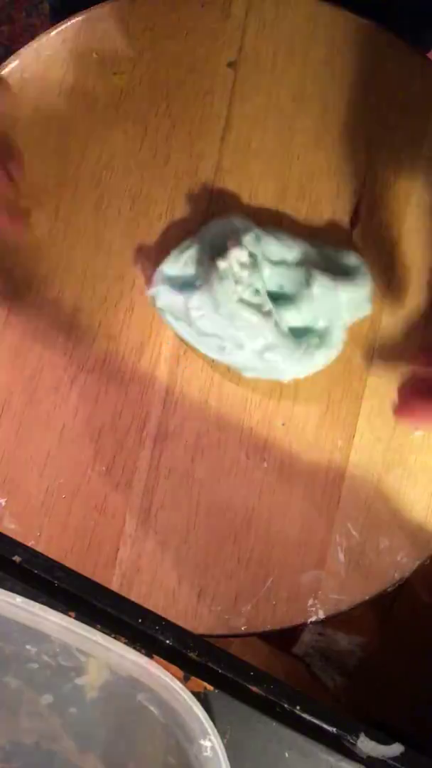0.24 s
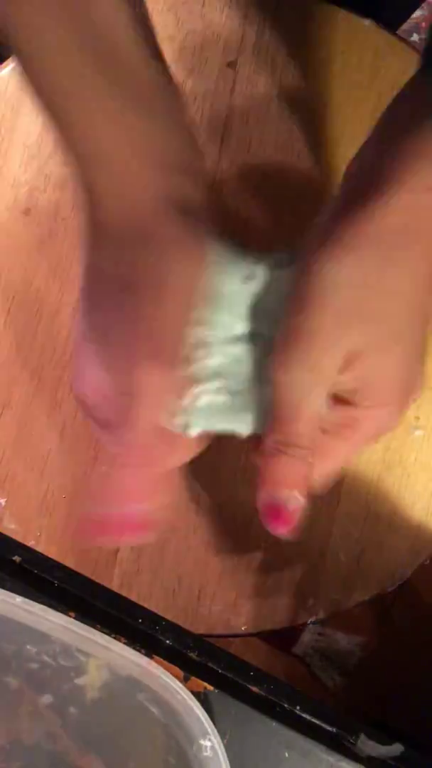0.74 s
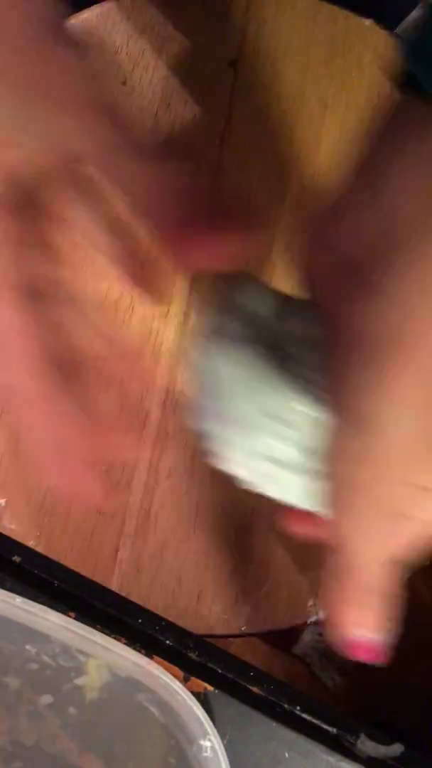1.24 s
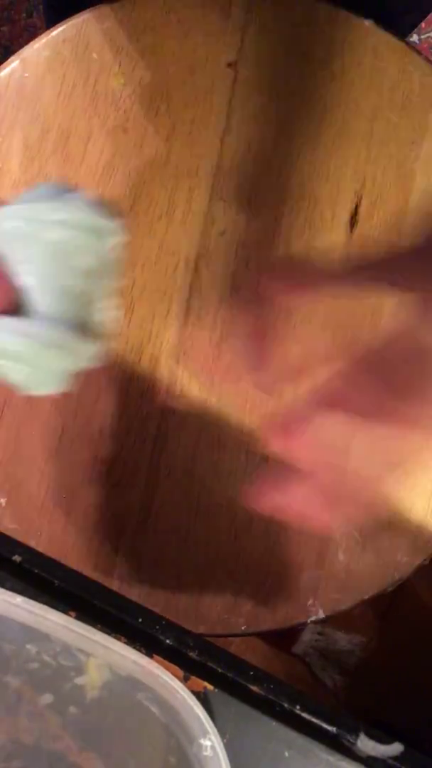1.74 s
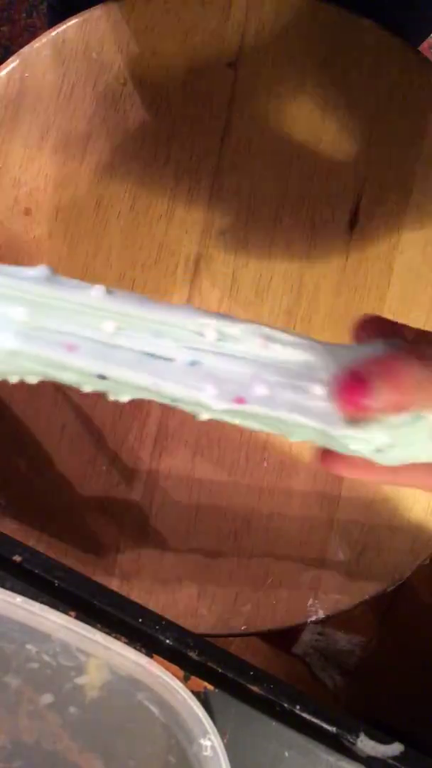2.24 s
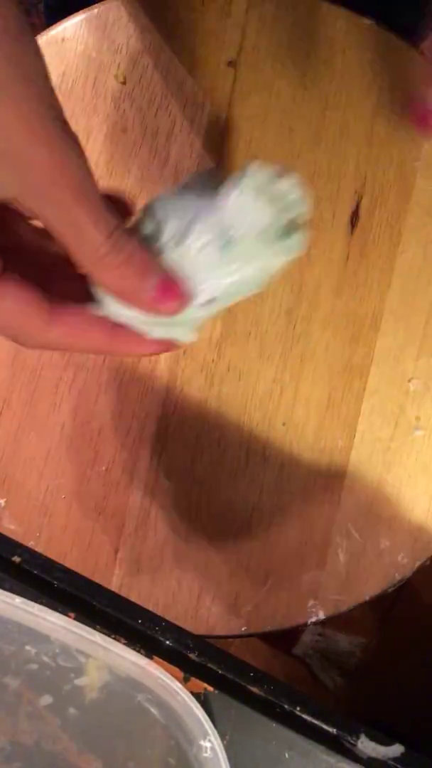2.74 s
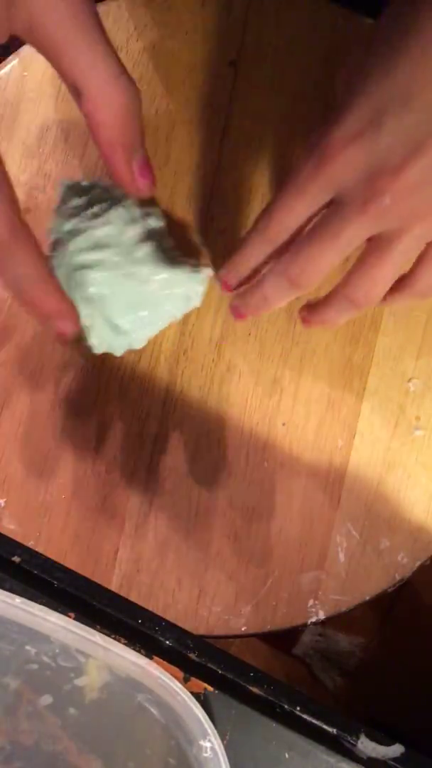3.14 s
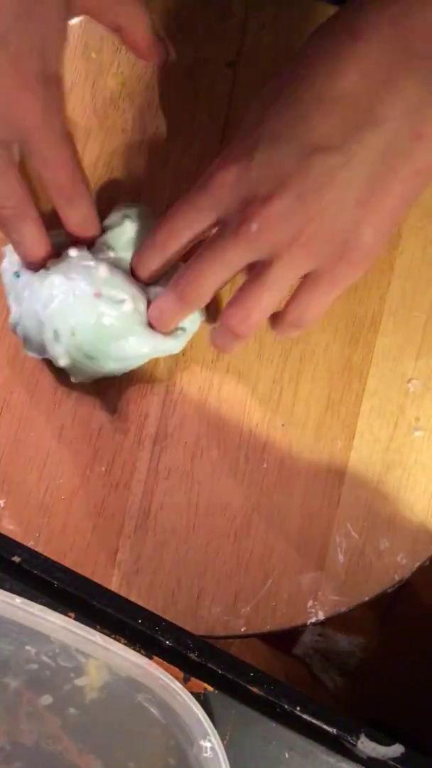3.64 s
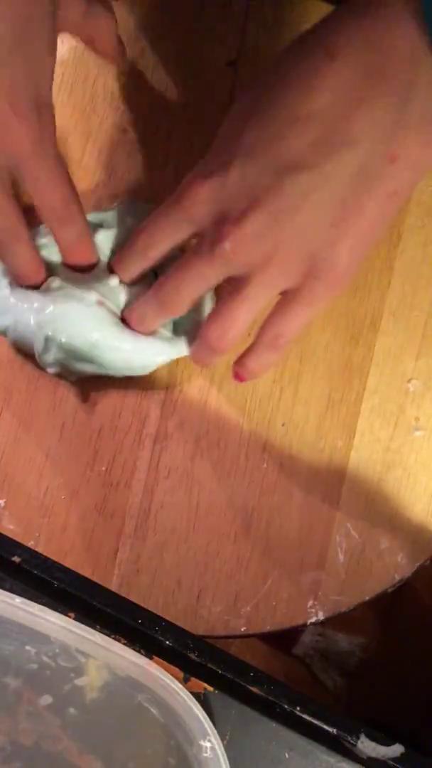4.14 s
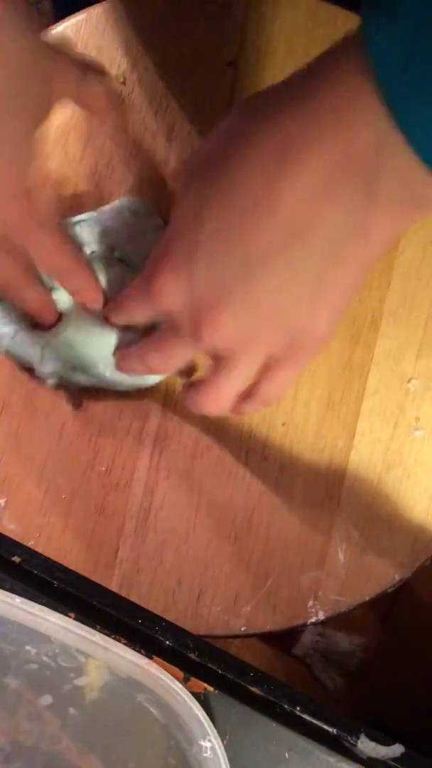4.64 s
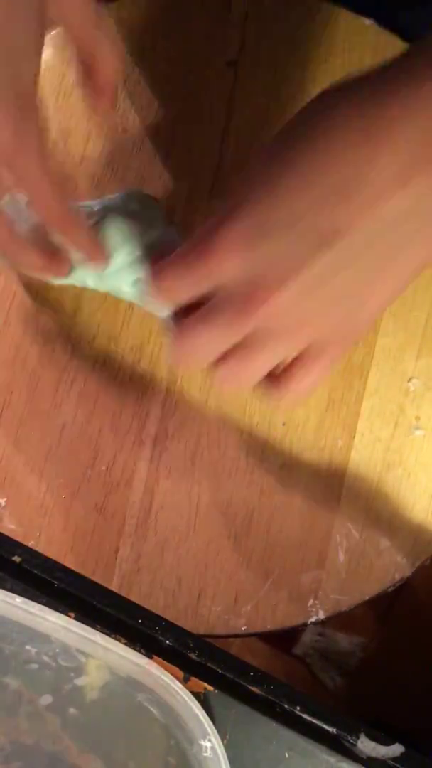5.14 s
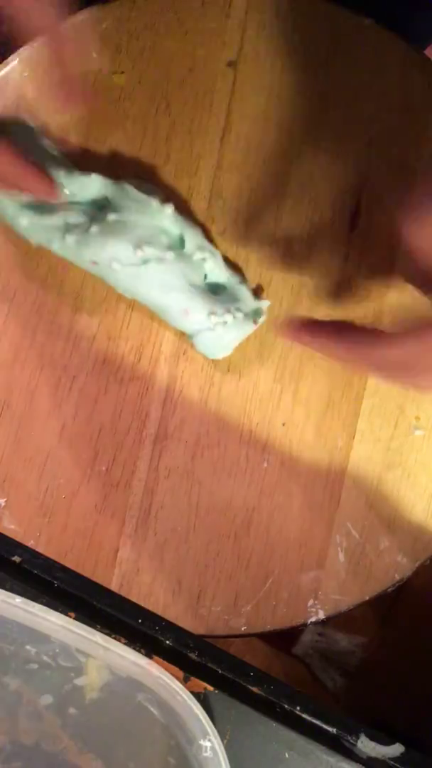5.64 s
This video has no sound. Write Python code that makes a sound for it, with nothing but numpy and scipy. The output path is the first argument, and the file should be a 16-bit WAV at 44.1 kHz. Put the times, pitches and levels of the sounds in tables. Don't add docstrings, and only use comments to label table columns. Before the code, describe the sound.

Sticky slime is pressed, pulled and folded by hand. Sparse tiny clicks and peeling crackle dominate the first half, with a cluster of bright pops around one and a half seconds. Later, dull fingertip knocks on a wooden table top mix with wet gurgling plops and several very sharp air-bubble snaps. Recorded close and mostly dry, indoors, with faint room drone and hiss beneath.

```python
import sys
import numpy as np
from scipy import signal
from scipy.fft import rfft, irfft, next_fast_len
from scipy.io import wavfile
from scipy.ndimage import uniform_filter1d, map_coordinates

SR = 44100
rng = np.random.default_rng(int(sys.argv[2]) if len(sys.argv) > 2 else 0)


def int16_out(signal):
    q = np.round(np.clip(np.atleast_2d(signal).T, -1, 1) * 32767)
    wavfile.write(sys.argv[1], SR, q.astype(np.int16))


def magnitude_from_level(level_db):
    exponent = np.asarray(level_db, float) / 20
    return 10 ** exponent


N = 260441


def unit(x):
    return x / np.sqrt(np.mean(x ** 2) + 1e-20)


def peak_one(x):
    return x / np.abs(x).max()


def add_at(out, start_s, sound):
    out[..., round(start_s * SR):][..., :sound.shape[-1]] += sound


def noise():
    return rng.standard_normal(N)


def along(points, hz):
    f, v = np.transpose(points)
    return np.interp(np.log(hz + 1), np.log(f + 1), v)


def curves(rows):
    s, *cols = np.transpose(rows)
    return [np.interp(np.arange(N) / SR, s, c) for c in cols]


def wobble(rate_hz):
    knots = rng.standard_normal(int(N * rate_hz / SR) + 4)
    return map_coordinates(knots, [np.arange(N) * rate_hz / SR])


def swells(peaks, rise_s, fall_s):
    swell_db, hop = 36.5, 64
    late = np.arange(0, N + hop, hop)[None] / SR - peaks[0][:, None]
    steps = np.maximum(-late / np.reshape(rise_s, (-1, 1)), late / np.reshape(fall_s, (-1, 1)))
    power = np.sum(magnitude_from_level(peaks[1][:, None] - swell_db * steps) ** 2, axis=0)
    return np.interp(np.arange(N), np.arange(len(power)) * hop, np.sqrt(power))


def filtered(x, response):
    m = next_fast_len(len(x) + min(len(x), 4096))
    return irfft(rfft(x, m) * response(np.fft.rfftfreq(m, 1 / SR)), m)[:len(x)]


def modes(rows):
    def response(f):
        return sum((-1) ** k * magnitude_from_level(db) * 1j * f * w / (c * c - f * f + 1j * f * w)
                   for k, (c, w, db) in enumerate(rows))
    return response


def coloured(spectrum):
    return lambda hz: magnitude_from_level(along(spectrum, hz))


def grains(per_second, spread_db, hiss):
    chance, size = rng.random(N), np.minimum(rng.exponential(size=N), 3)
    clicks = (chance < per_second / SR) * magnitude_from_level(spread_db * size) * np.sign(noise())
    return unit(unit(clicks) + hiss * noise())


# freq_hz [Hz], level_db [dB per Hz]
HUSH_SPECTRUM = [(15, -31.5), (25, 4), (100, 6), (233, -1.5), (887, -17.5), (1300, -11.5), (1410, -15.5),
                 (2780, -18), (7630, -22.5), (9230, -20), (10000, -25.5), (14700, -22), (16300, -21.5)]


def hush():
    hiss = filtered(noise(), lambda f: coloured(HUSH_SPECTRUM)(f) * (f < 15950))
    return magnitude_from_level(-67 + 1.1 * wobble(3)) * unit(hiss)


# time_s [s], level_db [dB]
SCRAPE_LEVELS = [
    [(1.745, -70), (1.77, -61), (1.86, -64.5), (2.0, -78)],
    [(5.8, -101), (5.874, -64.5), (5.906, -69)],
]
# freq_hz [Hz], width_hz [Hz], level_db [dB]
NEAR_BODY = [(550, 95, 4.5), (750, 54, 3.5), (2800, 220, -8), (3280, 45, 3), (4840, 390, -14.5),
             (5750, 110, -2.5)]
FAR_BODY = [(1680, 110, 1), (3100, 50, 0), (3880, 150, -4), (7170, 39, 8), (10400, 33, -2)]
MODE_FADES = [8, -7, -16, 200, 30, 148]
# centre_s [s], level_db [dB], pitch_hz [Hz], length_s [s]
SQUEAK_EVENTS = [
    (1.282, -68, 780, 0.12),
    (1.245, -69.5, 1280, 0.038),
    (2.105, -73.5, 1290, 0.073),
    (2.263, -78, 1180, 0.047),
    (2.33, -69.5, 1270, 0.066),
    (3.628, -66.5, 1266, 0.084),
]


def far_off():
    t, out = np.arange(N) / SR, np.zeros(N)
    catch_s = 1.777
    since_s = np.abs(t - catch_s) * (t < 3)
    for rows, body, lift_db in zip(SCRAPE_LEVELS, (NEAR_BODY, FAR_BODY), (4, -2.5)):
        inside = uniform_filter1d(1. * ((t > rows[0][0]) & (t < rows[-1][0])), size=2500)
        hum = np.zeros(N)
        for mode, fade_db_per_s in zip(body, MODE_FADES):
            swell = magnitude_from_level(3.5 * wobble(30) - fade_db_per_s * since_s)
            hum += swell * filtered(noise(), modes([mode]))
        hum /= np.sqrt(np.average(hum ** 2, weights=inside))
        out += inside * magnitude_from_level(curves(rows)[0] + lift_db) * hum
    for centre_s, db, hz, length_s in SQUEAK_EVENTS:
        narrow = unit(filtered(noise(), modes([(hz, 30, 0)])))
        out += magnitude_from_level(db) * np.exp(-np.abs(1.56 * (t - centre_s) / length_s) ** 5.9) * narrow
    return out


# time_s [s], force_db [dB], wetness_db [dB], loudest_hz (place on the table) [Hz]
PUSH_CURVES = [(0, -77, 13.5, 236), (.25, -42, -12.5, 212), (.34, -60.5, -5.5, 243), (.62, -66, -4, 200),
               (1.89, -64.5, -10, 264), (2.91, -74, -1, 186), (3.04, -52, -21, 147),
               (3.14, -60.5, -10.5, 194), (3.33, -63.5, -9, 202), (3.39, -59.5, -4.5, 266),
               (3.95, -55.5, -12, 262), (4.09, -53, -7, 255), (4.19, -46, -15, 192), (4.34, -55, -6, 295),
               (4.65, -52, -7.5, 330), (4.8, -53, -5.5, 238), (4.98, -55, -19, 209.5),
               (5.91, -61, -12, 217)]
# peak_s [s], level_db [dB]
LEG_HEAVES = [
    (.27, -54),
    (1.89, -86),
    (3.05, -56.5),
    (3.9, -55),
    (4.2, -60.5),
    (4.799, -62.5),
    (5.35, -61),
]
# freq_hz [Hz], width_hz [Hz], level_db [dB]
TABLE_MODES = [(123.8, 7.2, 1.5), (148.3, 16, 3), (206, 14.5, 1), (256.8, 19, -0.5), (317, 28, 3),
               (371, 24, 0.5)]
# freq_hz [Hz], width_hz [Hz], level_db [dB]
WET_POCKETS = [(452, 320, 1.5), (714, 40, 4), (780, 14, 2.5), (1100, 180, -9.5), (1280, 220, -1.5),
               (1690, 43, -5.5), (2180, 160, -15.5)]


def pushing():
    table_db, wetness_db, loudest_hz = curves(PUSH_CURVES)
    lumps = wobble(25)

    wood, power = np.zeros(N), np.zeros(N)
    for hz, width_hz, db in TABLE_MODES:
        away_db = np.minimum(22 * np.abs(np.log2(hz / loudest_hz)), 12)
        share = magnitude_from_level(db + 1.5 * wobble(5) - away_db)
        shaking = grains(300, spread_db=0.0, hiss=1.83)
        wood += share * unit(filtered(shaking, modes([(hz, width_hz, db)])))
        power += share ** 2
    wood /= np.sqrt(power)

    squeezes, wet = grains(260, spread_db=1.0, hiss=0.7), np.zeros(N)
    for k, pocket in enumerate(WET_POCKETS):
        swell = magnitude_from_level(3.8 * np.clip(wobble(45), -2, 1.5))
        wet += swell * filtered(np.roll(squeezes, k * SR // 3), modes([pocket]))

    rocking = swells(np.transpose(LEG_HEAVES), rise_s=0.052, fall_s=0.35) + magnitude_from_level(-75.5)
    legs, floor = modes([(60, 30, 0), (90, 30, -1)]), modes([(75, 70, 0)])
    sway = filtered(noise(), lambda f: legs(f) * floor(f))

    wood_gain = magnitude_from_level(table_db + 0.69 * lumps + 1.98 * wobble(6))
    wet_gain = magnitude_from_level(table_db + wetness_db + 1.1 * lumps)
    return wood_gain * wood + wet_gain * unit(wet) + rocking * unit(sway)


# freq_hz [Hz], level_db [dB per Hz]
RUSH_SPECTRUM = [(880, -2), (1500, -0.5), (2820, -6), (4580, -1.5), (10200, -4), (14300, -4), (15900, 2)]


def air_rush():
    peak_s, level_db, rise_s, fall_s, bright_hz = 0.24, -47.5, 0.054, 0.078, 7050
    late = np.arange(N) / SR - peak_s
    skin = unit(filtered(noise(), lambda f: coloured(RUSH_SPECTRUM)(f) * (f < 15950)))
    dull = filtered(skin, lambda f: 1 / (1 + (f / bright_hz) ** 4))

    def swell(lasts):
        return np.exp(-(late / np.where(late < 0, rise_s, lasts * fall_s)) ** 2 / 2)

    return magnitude_from_level(level_db + 0.65 * wobble(36.0)) * (swell(0.9) * dull + swell(0.33) * (skin - dull))


# start_s [s], peak_db [dB], pitch_hz [Hz]
FINGER_KNOCKS = [(0.197, -41, 258), (3.018, -35.5, 134), (3.032, -41.5, 146), (3.056, -47.5, 170),
                 (3.095, -49, 200), (3.231, -49, 179), (3.396, -49, 260), (3.709, -66, 202),
                 (4.096, -37.5, 209), (4.306, -40, 304), (4.358, -39.5, 299), (4.44, -58, 320),
                 (4.49, -49, 334), (3.87, -53, 380), (3.98, -48, 387), (4.53, -43.5, 290), (4.57, -48, 324),
                 (4.624, -37.5, 313), (4.679, -42, 335), (4.752, -35.5, 202), (4.938, -37, 217),
                 (5.049, -45, 198), (5.159, -40, 222), (5.274, -48, 195), (5.299, -54, 206),
                 (5.356, -50, 200), (5.403, -42, 204), (5.419, -42.5, 206), (5.519, -50.5, 196),
                 (5.636, -65, 220), (5.661, -40.5, 228), (5.685, -50, 254), (5.776, -51, 196),
                 (5.796, -46, 196),
                 (0.368, -57, 247),
    (0.495, -55, 245),
    (0.916, -46.5, 155),
    (1.147, -59, 183),
    (1.343, -54, 241),
    (1.45, -49, 210),
    (1.66, -50.5, 242),
    (1.807, -46.5, 249),
    (1.78, -48, 553),
    (1.838, -52.5, 249),
]
# start_s [s], peak_db [dB], pitch_hz [Hz]
MORE_KNOCKS = [
    (2.475, -55, 246),
    (2.54, -58.5, 330),
    (2.595, -51.5, 215),
    (2.704, -57, 193),
    (3.44, -48, 300),
    (3.864, -48, 149),
    (4.004, -46, 251),
    (4.158, -44, 207),
    (4.24, -49, 203),
    (4.35, -40, 206),
]


def knocks(rows):
    out, t = np.zeros(N + SR), np.arange(6144) / SR
    for start_s, db, hz in rows:
        blow = (1 - np.exp(-t / 0.00099)) * magnitude_from_level(-60 * t / 0.045) * rng.standard_normal(len(t))
        ring = filtered(blow, modes([(hz, 26, 0), (1.505 * hz, 90, -9)]))
        add_at(out, start_s, magnitude_from_level(db - 1.5) * peak_one(ring))
    return out[:N]


# peak_s [s], crackle_db [dB], rub_db [dB], rise_s [s], fall_s [s]
PEEL_EVENTS = [(.075, -58.5, -69, 0.026, 0.24), (0.117, -53, -56, 0.045, 0.13),
               (.43, -64.5, -82, 0.22, 0.25), (.585, -56.5, -69.5, 0.27, .15),
               (0.689, -56.5, -68, 0.38, 0.44), (.81, -58, -70, .15, 0.33),
               (1.11, -59.5, -70.5, 0.17, 0.18), (1.3, -82, -88, 0.42, .3), (.914, -44, -52.5, 0.14, 0.11),
               (1.158, -68, -70, 0.036, .1), (1.179, -46, -61, 0.048, 0.015),
               (1.454, -49.5, -63.5, 0.12, 0.39), (1.637, -47, -58.5, 0.15, 0.075),
               (2.02, -67.5, -71, 1, 0.25), (2.141, -57.5, -82, .09, 0.14), (2.66, -64, -69, 1, 0.5),
               (2.706, -56, -73, 0.13, 0.11), (2.78, -59, -67.5, 0.084, 0.071),
               (2.965, -56.5, -66, 0.17, 0.091), (3.06, -66.5, -78, 0.24, .2), (3.135, -62, -82, 0.052, .1),
               (3.213, -57, -74, 0.06, 0.054), (3.57, -70.5, -75.5, 0.18, 1.7),
               (3.875, -51, -58.5, 0.083, 0.26), (4.186, -59.5, -59.5, 0.31, 1.3),
               (4.41, -51.5, -48, 0.05, 0.19), (4.68, -70, -68, 0.14, 0.85),
               (4.822, -51.5, -50.5, 0.021, 0.28), (5.082, -67.5, -81, 0.19, 1.6),
               (5.561, -64, -61.5, 0.21, 0.065), (5.606, -44.5, -46, 0.045, .11),
               (5.905, -68, -59, 0.12, .1)]
# freq_hz [Hz], level_db [dB per Hz]
FILM_SPECTRUM = [(4650, -42), (7900, -12), (8530, -9.5), (12700, -7.5), (14800, -1.5), (15800, 1),
                 (16500, -12)]
# freq_hz [Hz], level_db [dB per Hz]
SKIN_SPECTRUM = [(1060, -8), (1800, -1.5), (1970, -3.5), (2260, 0), (2820, -3), (4560, -2.5), (8500, -7),
                 (11000, -37.5), (18700, -120)]
PATCH_EDGES = [0, 2600, 4000, 6000, 20000]


def peeling():
    peak_s, crackle_db, rub_db, rise_s, fall_s = np.transpose(PEEL_EVENTS)
    rub_lingers = 0.88
    tearing = swells((peak_s, crackle_db), rise_s, fall_s)
    rubbing = swells((peak_s, rub_db), rub_lingers * rise_s, rub_lingers * fall_s)
    crackle = filtered(grains(900, spread_db=3, hiss=1.1),
                       lambda f: coloured(FILM_SPECTRUM)(f) * (f > 7900) * (f < 15950))
    skin, rub = filtered(grains(1100, spread_db=4.0, hiss=1.36), coloured(SKIN_SPECTRUM)), np.zeros(N)
    for lo, hi in zip(PATCH_EDGES, PATCH_EDGES[1:]):
        rub += magnitude_from_level(3.2 * wobble(30)) * filtered(skin, lambda f: (f >= lo) * (f < hi))
    flutter = magnitude_from_level(-3.0 + 2 * wobble(90))
    return flutter * (tearing * unit(crackle) + rubbing * unit(rub))


# start_s [s], peak_db [dB], pitch_hz [Hz]
SKIN_TICKS = [(0.613, -51.5, 5800), (0.704, -55, 3650), (0.819, -52.5, 3940), (1.087, -47.5, 2880),
              (1.478, -66, 2300), (1.55, -48.5, 2380), (1.59, -56, 2300), (1.615, -58, 2400),
              (2.601, -53, 3380), (2.602, -59, 1300), (.675, -56, 1480), (4.033, -60, 2540),
              (4.089, -49, 2530), (4.141, -50, 4720), (4.152, -56, 4500), (4.223, -47.5, 4450),
              (4.273, -47.5, 4250), (4.287, -49, 4370), (4.343, -52, 3380), (4.375, -44, 4860),
              (4.39, -44, 1300), (4.572, -52, 1930), (5.158, -57, 3040), (.118, -48, 3300)]


def dull_ticks():
    out, t = np.zeros(N + SR), np.arange(1024) / SR
    for start_s, db, hz in SKIN_TICKS:
        click = filtered(magnitude_from_level(-60 * t / 0.02) * rng.standard_normal(len(t)), modes([(hz, 0.28 * hz, 0)]))
        add_at(out, start_s, magnitude_from_level(db) * peak_one(click))
    return out[:N]


# start_s [s], peak_db [dB], pitch_hz [Hz], t60_s [s]
CLEAR_BUBBLES = [
    (0.1412, -46, 1690, 0.089),
    (0.919, -32, 1630, 0.012),
    (2.599, -52, 3420, .015),
    (3.399, -50, 780, .03),
    (4.195, -50, 1680, 0.033),
    (4.4032, -39.5, 1100, 0.027),
    (4.408, -42, 1660, 0.035),
    (4.8269, -31, 1020, 0.0203),
]


def bubbles():
    out, t = np.zeros(N + SR), np.arange(4096) / SR
    for start_s, db, hz, t60_s in CLEAR_BUBBLES:
        envelope = magnitude_from_level(db + 2 - 60 * t / t60_s) * (1 - np.exp(-t / .0006))
        add_at(out, start_s, envelope * np.sin(2 * np.pi * hz * t))
    return out[:N]


# start_s [s], peak_db [dB], pitch_hz [Hz], t60_s [s], gurgle_db [dB]
PLOP_EVENTS = [(0.139, -58, 1680, 0.1, 1), (0.239, -46.5, 1280, 0.27, 2.5), (0.918, -43.5, 1700, 0.022, 4),
               (0.93, -65, 1675, 0.27, 11), (3.4, -56, 780, 0.084, -4), (3.461, -58, 1140, 0.074, -2),
               (3.556, -57, 1280, 0.098, 3), (3.6, -59.5, 1730, 0.17, 6.5), (3.43, -60, 1010, .1, 3),
               (3.47, -59, 1100, .1, -5), (3.575, -62, 1520, 0.11, -2), (3.68, -59, 930, 0.081, -3),
               (3.836, -51, 653, 0.15, -1), (3.869, -42, 740, 0.15, -6.5), (3.873, -57, 1610, 0.15, 6.5),
               (4.192, -46.5, 586, 0.13, 0.5), (4.368, -49, 685, 0.16, 3.5), (4.4025, -34, 1150, 0.17, -7),
               (4.406, -42, 1680, 0.061, 2.5), (4.455, -47.5, 633, 0.11, 5.5),
               (4.625, -46, 637, 0.16, -9.5), (4.749, -46.5, 764, .1, -3), (4.797, -37, 730, 0.13, -4.5),
               (4.826, -33.5, 882, 0.096, -2.5), (4.842, -41.5, 945, 0.07, 4),
               (4.861, -56.5, 1360, 0.35, 4), (4.799, -55, 1710, .07, -1.5), (4.943, -51, 706, 0.15, 3.5),
               (5.159, -62, 710, 0.09, 8.5), (5.555, -50, 1690, 0.055, -10), (5.6, -41, 1350, 0.25, -5),
               (5.662, -58.5, 843, 0.096, 5.5), (4.24, -56, 605, 0.063, 7), (4.54, -70, 640, 0.057, 3),
               (5.411, -54.5, 878, 0.17, -10)]
# freq_hz [Hz], width_hz [Hz], level_db [dB]
POCKET_MODES = [(780, 17, -13.5), (1090, 83, -7.5), (1349, 34, 1), (1690, 135, 0.5)]


def plops():
    out, t = np.zeros(N + SR), np.arange(6144) / SR
    start = 1 - np.exp(-t / 0.00017)
    for start_s, db, hz, t60_s, gurgle_db in PLOP_EVENTS:
        woken = [(c, w, g - 18 * abs(np.log2(c / hz))) for c, w, g in POCKET_MODES]
        click = filtered(start * magnitude_from_level(-60 * t / 0.0034) * rng.standard_normal(len(t)), modes(woken))
        own = modes([(hz, 200, 0), (1.5 * hz, 260, -8)])
        flutter = 1 + 0.66 * np.sin(2 * np.pi * (rng.random() + 55 * t))
        decay = start * magnitude_from_level(-60 * t / np.clip(t60_s, .01, .4))
        gurgle = filtered(decay * flutter * rng.standard_normal(len(t)), lambda f: own(f) ** 2)
        add_at(out, start_s, magnitude_from_level(db) * (peak_one(click) + magnitude_from_level(gurgle_db) * peak_one(gurgle)))
    return out[:N]


# start_s [s], peak_db [dB]
SEAL_BREAK = (5.5539, -19)
# freq_hz [Hz], width_hz [Hz], level_db [dB]
SEAL_FILM = [(12100, 1300, 0), (14100, 1700, 0)]


def snap():
    start_s, peak_db = SEAL_BREAK
    step = np.zeros(N)
    step[round(start_s * SR)] = 1
    even = filtered(step, modes([(295, 780, 1.7), (2490, 6500, -4.5)]))
    film = filtered(step, lambda f: modes(SEAL_FILM)(f) ** 2)
    return magnitude_from_level(peak_db) * peak_one(even) + magnitude_from_level(-5.5) * peak_one(film)


# start_s [s], peak_db [dB],
# skin_db [dB]
LONE_TICKS = [(0.695, -42, -20), (0.727, -37, -17), (0.903, -40, -21), (0.9, -33.5, -6.5),
              (1.086, -37, -11), (1.164, -35, -21), (1.179, -39, -20), (1.4427, -35, -23),
              (1.4545, -32.5, -14.5), (1.626, -33, -30), (1.6552, -36, -2), (2.03, -31, -32),
              (2.137, -44, -16), (2.278, -44, -18), (1.9695, -48.5, -5), (2.691, -40.5, -8),
              (2.702, -32, -29), (2.7826, -29.5, -22), (2.92, -42, -27), (3.1136, -50, -25),
              (3.3722, -44.5, 2.5), (3.7295, -40.5, -21), (3.7564, -36, -34), (3.772, -44, -8),
              (4.1846, -42.5, 8.5), (4.195, -47, 6), (4.265, -47.5, -1), (4.365, -34, -9),
              (4.4374, -40, 9.5), (5.4088, -51, 4.5), (1.479, -41, -10), (1.569, -44, -22),
              (1.6005, -37, -22), (1.6149, -34, -12), (1.667, -40, -25), (2.592, -57, -27),
              (2.627, -48, -22), (2.642, -40, -27), (2.665, -53, -20), (2.736, -46, -22), (2.772, -44, -22),
              (4.775, -44, -19.5), (4.939, -54, 3), (5.093, -54, -20), (5.194, -49.5, -25),
              (5.209, -48, -22), (5.304, -52, -22), (5.35, -49.5, 0),
              (0.5644, -43, -20), (0.6164, -50, -22), (0.6315, -48, -22), (0.6479, -48, -19),
              (0.7464, -41, -24), (0.8026, -49, -22), (0.8355, -53, -22), (0.8588, -38, -24),
              (0.9804, -44, -17), (1.407, -44, -16), (1.7085, -51, -20), (1.7337, -51, -22),
              (1.9285, -52, -19), (2.0168, -53, -28), (2.0532, -46, -24), (2.1824, -49, -22),
              (2.2976, -42.5, -15), (2.3351, -53, -22), (2.472, -48, -24), (3.02, -50, -22),
              (3.0649, -51, -22), (3.1033, -49, -24), (3.1298, -49, -21), (3.1951, -51, -20),
              (3.2151, -48, -12), (3.676, -54, -20), (3.881, -36, -24), (3.9848, -51, -22),
              (4.0297, -47.5, -16), (4.1695, -40, -22), (4.2198, -45, -22), (4.351, -40, -22),
              (4.5317, -46, -20), (4.57, -50.5, -3), (4.6229, -50, 0)]


def small_pockets():
    swarm = []
    for peak_s, crackle_db, _, rise_s, fall_s in PEEL_EVENTS:
        a, b, c = rng.standard_normal(3)
        start_s = peak_s + 0.28 * a * (fall_s if a > 0 else rise_s)
        swarm.append((start_s, crackle_db - 2.3 * abs(a) + 3 * b, -22 + 7 * c))
    full_skin_hz, duller_hz_per_db = 10500, 146
    return [(np.clip(s, 0, N / SR), db, np.clip(full_skin_hz - duller_hz_per_db * skin_db, 8000, 15200), skin_db)
            for s, db, skin_db in LONE_TICKS + swarm]


# start_s [s], peak_db [dB], snap_hz [Hz], skin_db [dB]
PITCHED_POPS = [(0.1066, -35, 12700, -22), (.1085, -27, 12600, -26), (.1097, -28, 9500, -24),
                (.111, -27.5, 12700, -20), (0.1392, -10.5, 15900, -5.5), (.1818, -34, 12500, -30),
                (.1834, -26, 12900, -28), (0.6734, -29.5, 14100, -19), (0.8873, -30, 14600, -27),
                (0.919, -35.5, 9300, 4.5), (1.5357, -23, 14300, -23), (1.5438, -21, 14000, -25),
                (1.5481, -31, 14000, -13), (1.549, -26.5, 13900, -14.5), (1.587, -22, 15000, -17),
                (1.5977, -20.5, 14500, -28), (1.611, -24, 14000, -15), (1.62, -20.5, 14500, -13),
                (2.5997, -30.5, 15000, -17), (2.7134, -26, 11500, -29), (2.9635, -28, 13100, -22),
                (3.835, -17.5, 13400, -19), (3.8686, -6, 13860, -23.5), (4.7982, -5, 13900, -19),
                (4.8257, -1.5, 14240, -21), (4.844, -30, 13700, -12), (5.554, -12, 15000, -8),
                (1.5933, -27, 12800, -9), (5.5998, -23.5, 11400, -7), (5.147, -44.5, 11500, -20)]
# start_s [s], peak_db [dB], snap_hz [Hz], skin_db [dB]
RAGGED_POPS = [
    (4.4018, -17, 13800, -14),
    (4.4027, -10, 12500, -22),
    (4.4038, -21, 14000, -6),
    (5.5994, -17, 12400, -15),
    (5.6009, -13, 13000, -20),
    (5.6017, -13, 12700, -15),
    (5.6032, -19, 12700, -8),
]


def pops():
    lead = 256
    out, t = np.zeros((2, N + SR)), np.arange(-lead, 1024) / SR
    skin = modes([(2400, 1100, -9.0), (3850, 2830, 2.0), (6100, 6700, 0.0)])
    rest = modes([(8440, 1100, -5.0), (11500, 5500, -10.0), (15000, 1080, -9.5)])
    for start_s, db, hz, skin_db in PITCHED_POPS + RAGGED_POPS + small_pockets():
        big = magnitude_from_level(0.08 * (db + 31))
        fall = magnitude_from_level(-60 * t / (.0012 + .0018 * big)) + .17 * big * magnitude_from_level(-60 * t / (.008 + .01 * big))
        lead_in = magnitude_from_level(-28 + 60 * t / .006) / max(big, 1) ** 2
        envelope = np.where(t < 0, lead_in, fall)
        tear = envelope * rng.standard_normal((2, len(t))) + np.array([[3.5], [1]]) * (t == 0)
        tone = modes([(hz, 3500, 0)])
        top = filtered(tear[0], lambda f: tone(f) ** 2 + rest(f))
        top = filtered(top, lambda f: 1 / (1 + (7850 / (f + 1)) ** 60))
        middle = filtered(tear[1], skin)
        add_at(out, start_s, magnitude_from_level(db) * np.array([peak_one(top), magnitude_from_level(skin_db) * peak_one(middle)]))
    film_part, skin_part = out[:, lead:N + lead]
    return filtered(film_part, lambda f: f > 7900) + skin_part


# freq_hz [Hz], t60_s [s]
ROOM_DECAY = [(300, 0.98), (2000, 0.1), (8000, 0.076), (16000, 0.033)]


def room(x):
    out, step, delay = np.zeros(N + SR), SR // 4, 130
    for start in range(0, N, step):
        hz, t, z = signal.stft(rng.standard_normal(SR // 3), SR, nperseg=256)
        decay = magnitude_from_level(-60 * t / along(ROOM_DECAY, hz)[:, None])
        tail = signal.istft(z * decay, SR, nperseg=256)[1]
        answer = signal.fftconvolve(x[start:start + step], tail / np.linalg.norm(tail))
        out[start + delay:][:len(answer)] += answer
    return out[:N]


def scene():
    soft = hush() + far_off() + pushing() + air_rush() + peeling()
    touches = knocks(FINGER_KNOCKS) + knocks(MORE_KNOCKS)
    bursts = dull_ticks() + bubbles() + plops() + snap() + pops()
    return (soft + touches + bursts + magnitude_from_level(-18.0) * room(bursts))[None]


def band_limit(x):
    return signal.sosfilt(signal.butter(12, 16960, fs=SR, output="sos"), x)


def record(dry):
    def band(f):
        return 1 / (1 + (45 / (f + 1)) ** 4) / (1 + (f / 16100) ** 40) * (f < 16950)
    mix = filtered(dry[0], band)[None]
    return band_limit(mix)


dry = scene()
out = record(dry)
int16_out(out)
```